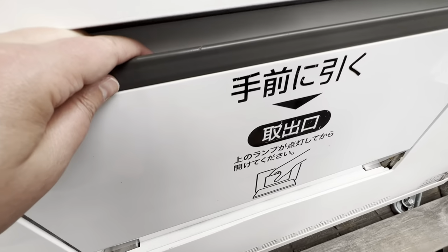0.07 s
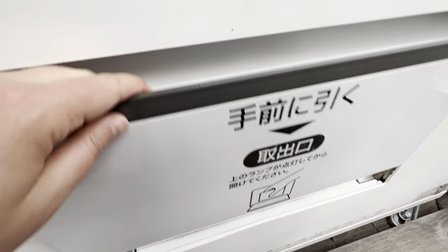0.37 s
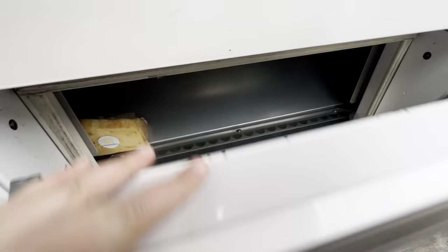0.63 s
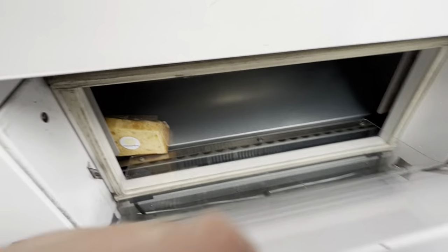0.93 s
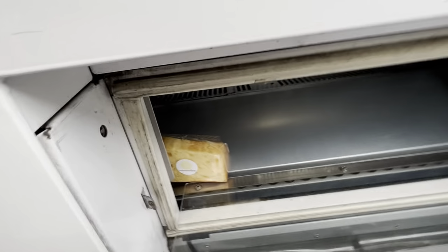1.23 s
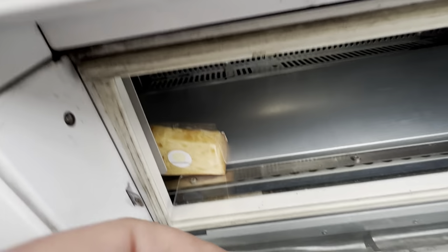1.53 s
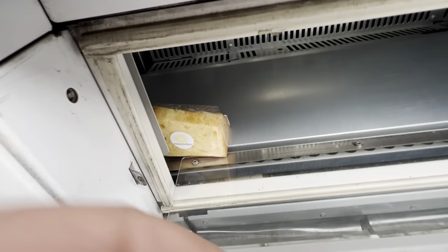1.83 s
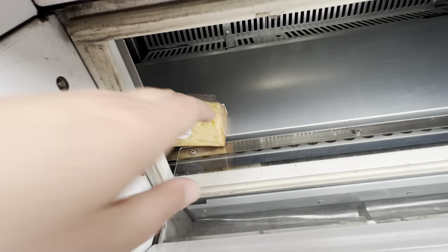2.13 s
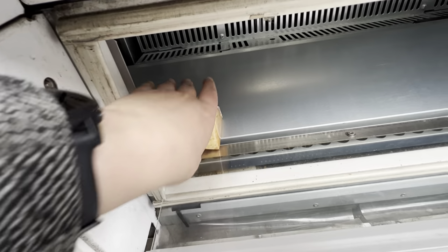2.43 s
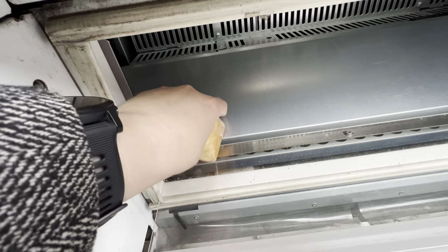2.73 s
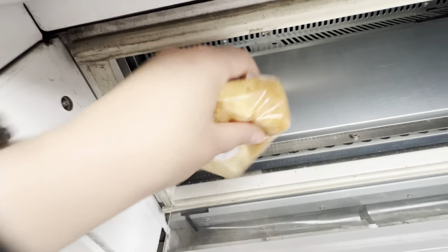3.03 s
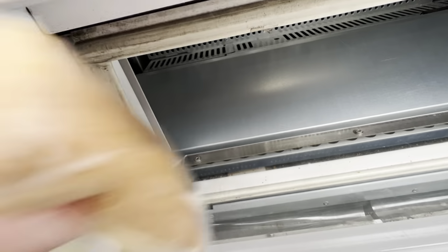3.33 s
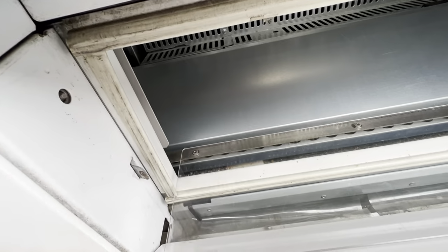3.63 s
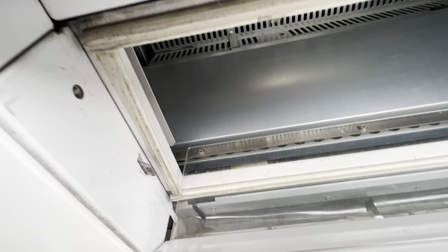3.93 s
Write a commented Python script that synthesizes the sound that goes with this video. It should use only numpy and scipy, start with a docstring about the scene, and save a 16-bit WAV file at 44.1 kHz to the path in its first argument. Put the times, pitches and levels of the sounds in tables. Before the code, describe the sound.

Heard up close, the metal flap of a refrigerated vending machine unlatches and drops open with two rattling knocks. Fan noise and a faint hiss join the steady hum, then a hand grabs a wrapped cake, crackling its plastic film.

```python
"""The flap of a refrigerated vending machine is pulled down: the catch clicks, the hinge rubs, the flap
clatters twice against its stops. Each contact chatters and rings the metal and the panel.
A hand then lifts out a cake in plastic film, which buckles in loud snaps and small creases.
The compressor hums throughout; fan noise and a thin hiss come out of the open cold compartment."""
import sys
import numpy as np
from scipy import signal
from scipy.fft import rfft, irfft
from scipy.io import wavfile

SR = 44100
rng = np.random.default_rng(int(sys.argv[2]) if len(sys.argv) > 2 else 0)


def transcribe(signal):
    """Save signal, clipped to [-1, 1], as a 16-bit WAV file at the path in sys.argv[1]."""
    frames = np.atleast_2d(signal).T
    limited = np.clip(frames, -1, 1)
    pcm = np.round(limited * 32767).astype(np.int16)
    wavfile.write(sys.argv[1], SR, pcm)


N = 176400
RING_SAMPLES = SR // 2
THIRD_OCTAVE_EDGES_HZ = 28 * 2 ** (np.arange(29) / 3)

# Left-right likeness of impacts and of steady noise: (frequency [Hz], correlation before clipping [-])
IMPACT_LIKENESS = [(60, 0.85), (250, 0.87), (600, -0.056), (1500, -0.27), (5000, -0.057), (14000, -0.0036)]
AIR_LIKENESS = [(50, 0.28), (130, 1), (300, 0.64), (700, 0.069), (9500, -0.014), (11200, -2.3),
                (12600, .85)]

# Machine noise: (frequency [Hz], relative density [dB])
COMPRESSOR_SPECTRUM = [(20, -9), (45, -5), (125, -4), (340, -5.5), (460, -25.5), (600, -9), (870, -19.5),
                       (2000, -28), (9000, -45.5), (15000, -63)]
FAN_SPECTRUM = [(40, -29), (110, 1), (175, -8), (255, 5.5), (370, -1), (440, 8.5), (640, -4.5), (740, -13),
                (840, -1.5), (980, -8.5), (2500, -24), (8000, -38)]
HISS_SPECTRUM = [(3000, -24), (5000, -6.5), (5720, -3), (6600, -8.5), (8100, -7), (9400, -8), (10400, -5.5),
                 (11800, -9.5), (12650, 2.5), (13500, 9), (14200, -7), (15600, -0.5)]
# Machine tones: (frequency [Hz], level [dB], steady power share [0-1])
COMPRESSOR_TONES = [(49.7, -47, .95), (100.1, -38.3, .97), (106.5, -48, .7), (126.3, -51.5, .8),
                    (607, -44.3, .9)]
FAN_TONES = [(141.3, -45.5, .6), (253, -51, .7), (635.2, -44.5, .6), (855.4, -40.8, .95)]
# Fan and hiss as the compartment opens: (time [s], gain [dB])
FAN_SWELL = [(0, -42), (.45, -7.5), (.62, -1.5), (1.0, -6.5), (1.4, -1), (4, -1)]
HISS_SWELL = [(.29, -31), (.6, 0.5), (.95, -6), (1.3, -1), (1.9, 0), (4, -1)]

# Film crack: (frequency [Hz], relative density [dB])
FILM_SPECTRUM = [(400, -1), (900, 4.5), (1700, -0.5), (3000, -7.5), (4500, -6), (7000, -4), (9200, 0.5),
                 (11500, -21), (13000, -7), (15500, -6)]
# Film snaps: (time [s], level [dB], facet resonance [Hz], pan L-R [dB])
FILM_SNAPS = [(2.4278, -11, 2960, -6.5), (2.438, -20, 1290, 13), (2.5025, -18, 6860, 4),
              (2.54, -19, 2430, 0), (2.6022, -10.5, 4200, -1.5), (2.62, -17.5, 6500, 2),
              (2.6741, -21.5, 7050, -8), (2.72, -16, 1490, -4), (2.73, -20, 1810, 4),
              (2.7654, -14, 1700, 1), (2.7877, -15.5, 1300, 2), (2.8139, -13, 3370, -4),
              (2.8173, -11, 1790, -3), (2.8769, -15.5, 4500, -1), (2.881, -19.5, 7850, 3),
              (2.9327, -20, 8900, -7), (3.043, -25, 8500, -3), (3.2624, -21, 2580, 6.5),
              (3.3651, -25, 8200, 9), (3.411, -25, 5600, 3), (3.6665, -28, 5400, 9),
              (3.7332, -30, 7500, 12), (3.7772, -26, 3420, 7), (3.9309, -31.5, 5300, 11)]
# How hard the film is handled: (time [s], crease level [dB])
FILM_HANDLING = [(2.36, -52.5), (2.53, -36), (2.58, -43.5), (2.66, -40.5), (2.73, -28.5), (2.80, -36),
                 (2.93, -34), (3.02, -44), (3.2, -50.5), (4, -52)]

# Flap contacts: (time [s], clack level [dB], thud level [dB], clack tilt [dB/octave])
FLAP_CONTACTS = [(0.3185, -40.5, -64, 2), (0.34, -33.5, -64, 8), (.355, -25.5, -30, -0.5),
                 (0.3921, -25, -45, -2.5), (.397, -36.5, -41, 3.5), (0.4615, -22, -24.5, -2.5),
                 (0.542, -26, -29.5, -2.5), (0.5665, -28, -29.5, -5), (.752, -48, -23, 3),
                 (0.7818, -21.5, -35, 3.5), (0.7864, -18, -14, -5.5), (0.8009, -18.5, -20, 0),
                 (.8094, -18.5, -22, 2), (.8187, -23.5, -25, 2), (0.827, -27, -25, 3),
                 (.848, -26.5, -28, -1.5), (0.8863, -28.5, -35, -3.5), (0.9252, -33, -54, -4.5),
                 (1.0161, -20, -20.5, -0.5), (1.033, -22, -16.5, -4), (1.0403, -18.5, -40, 1.5),
                 (1.051, -24.5, -26.5, 4.5), (1.076, -27.5, -27, -2.5), (1.118, -28.5, -39, -5),
                 (1.16, -32.5, -37, -5.5), (1.227, -38, -36, -15)]
# Dense ringing of flap (clack) and panel (thud): (frequency [Hz], relative density [dB])
CLACK_SPECTRUM = [(300, -40), (550, -8.5), (850, 6), (1100, 0), (1550, 3), (2100, -1), (2900, 3.5),
                  (4200, -5.5), (6300, -0.5), (8800, 0.5), (10200, -9.5), (11500, -12), (15500, -17)]
THUD_SPECTRUM = [(35, -15), (75, 1), (110, 0.5), (165, -4.5), (220, 2.5), (340, 2), (450, -0.5), (650, -17),
                 (1200, -25)]
# Its decay: (frequency [Hz], T60 [s])
CLACK_DECAY = [(400, 0.17), (1500, 0.16), (4000, 0.14), (9000, 0.028), (15000, .04)]
THUD_DECAY = [(60, 0.98), (200, 0.13), (600, 0.043)]
# Clear modes of the flap: (frequency [Hz], relative level [dB], T60 [s])
METAL_MODES = [(800, -19, .2), (900, -21, .2), (1170, -22, .35), (1482, -20, .28), (1514, -19, .28),
               (2957, -23, .25), (3180, -21, .2), (4830, -23, .16), (5695, -20, .16), (8212, -22, .12),
               (8477, -22, .12), (9226, -21, .12), (9809, -25, .15)]
PANEL_MODES = [(97, -1, .25), (220, -3, .21), (334, -1, .18), (407, 3.5, .22), (490, -2, .22),
               (641, -7, .15)]

# Microphone port peaks and notches: (frequency [Hz], width [Hz], left gain [dB], right gain [dB])
PORT_RESONANCES = [(4700, 2000, 2.5, -3), (5370, 260, -26, -29), (7606, 840, -30, -46), (9530, 690, 2, 10)]


def from_db(db):
    """Decibels to gain."""
    return 10 ** (np.asarray(db) / 20)


def unit_rms(x):
    """Scale to rms 1."""
    return x / np.sqrt(np.mean(x ** 2) + 1e-20)


def at_hz(table, hz):
    """Interpolate on a log-frequency axis."""
    points_hz, values = np.transpose(table)
    return np.interp(np.log(np.maximum(hz, 1)), np.log(points_hz), values)


def gain_curve(table):
    """Gain per sample from (time [s], level [dB])."""
    return from_db(np.interp(np.arange(N) / SR, *np.transpose(table)))


def pan(db):
    """Stereo gains for an L-R level difference."""
    return from_db(np.array([[.5], [-.5]]) * db)


def add(out, time_s, sound):
    """Mix a sound in at time_s."""
    start = int(time_s * SR)
    out[:, start:start + sound.shape[1]] += sound[:, :N - start]


def bandpass(x, hz, width_hz):
    """One resonance, peak gain 1."""
    return signal.lfilter(*signal.iirpeak(hz, hz / width_hz, fs=SR), x)


def mode(force, hz, t60_s):
    """Damped resonator: a unit impulse rings a sine of height 1."""
    r, w = np.exp(-np.log(1000) / (t60_s * SR)), 2 * np.pi * hz / SR
    return signal.lfilter([0, np.sin(w)], [1, -2 * r * np.cos(w), r * r], force + 1e-18)


def noise(spectrum, likeness, samples=N):
    """Coloured, partly correlated stereo noise; rms 1."""
    hz = np.arange(samples // 2 + 1) * SR / samples
    alike = np.clip(at_hz(likeness, hz), -.99, .99)
    mid, side = rfft(rng.standard_normal((2, samples))) * from_db(at_hz(spectrum, hz))
    stereo = np.sqrt(1 + alike) * mid + np.sqrt(1 - alike) * side * [[1], [-1]]
    return unit_rms(irfft(stereo, samples))


def dense_ring(spectrum, decay, tail_db, tail_t60_s, tilt_db_oct=0):
    """Many close modes struck at once: each third octave decays at its own rate, over a cabinet tail."""
    t = np.arange(RING_SAMPLES) / SR
    hz = np.arange(RING_SAMPLES // 2 + 1) * SR / RING_SAMPLES
    white = rfft(noise([(1, 0), (2, 0)], IMPACT_LIKENESS, RING_SAMPLES))
    tail = from_db(tail_db - 60 * t / tail_t60_s)
    out = np.zeros((2, RING_SAMPLES))
    for low_hz, high_hz in zip(THIRD_OCTAVE_EDGES_HZ, THIRD_OCTAVE_EDGES_HZ[1:]):
        if high_hz > spectrum[0][0] and low_hz < spectrum[-1][0]:
            centre_hz = np.sqrt(low_hz * high_hz)
            band = irfft(white * ((hz >= low_hz) & (hz < high_hz)), RING_SAMPLES)
            envelope = from_db(-60 * t / at_hz(decay, centre_hz)) + tail
            density_db = at_hz(spectrum, centre_hz) + tilt_db_oct * np.log2(centre_hz)
            out += unit_rms(band * envelope) * np.sqrt(high_hz - low_hz) * from_db(density_db)
    return unit_rms(out) * np.sqrt(.01 * SR / RING_SAMPLES)  # energy of 10 ms at rms 1


def tones(table, waver_share=0.01, left_lag_s=0.00027, control_hz=400):
    """Machine tones, part steady, part wavering; they reach the left ear later."""
    out, t = 0, np.arange(N) / SR
    control_t = np.arange(5 * control_hz) / control_hz
    for hz, db, steady in table:
        r = np.exp(-2 * np.pi * hz * waver_share / control_hz)
        white = rng.standard_normal((2, len(control_t)))
        real, imag = unit_rms(signal.lfilter([1], [1, -2 * r, r * r], white))
        waver = np.interp(t + 1, control_t, real + 1j * imag)  # skip 1 s of filter settling
        amplitude = np.sqrt(2 * steady) + np.sqrt(1 - steady) * waver
        carrier = np.exp(2j * np.pi * hz * np.array([t - left_lag_s, t]))
        out = out + from_db(db) * unit_rms(np.real(amplitude * carrier))
    return out


def compressor(noise_db=-39, tone_gain_db=-0.08):
    """Constant rumble and hum."""
    rumble = from_db(noise_db) * noise(COMPRESSOR_SPECTRUM, AIR_LIKENESS)
    return rumble + from_db(tone_gain_db) * tones(COMPRESSOR_TONES)


def fan(noise_db=-37.5, tone_gain_db=0.2, pan_db=-7):
    """Air noise and tones, heard through the opening."""
    air = from_db(noise_db) * noise(FAN_SPECTRUM, AIR_LIKENESS)
    hum = from_db(tone_gain_db) * tones(FAN_TONES)
    return gain_curve(FAN_SWELL) * pan(pan_db) * (air + hum)


def hiss(gain_db=-45, pan_db=0.5):
    """Thin hiss; grows as the compartment opens and comes closer."""
    return from_db(gain_db) * gain_curve(HISS_SWELL) * pan(pan_db) * noise(HISS_SPECTRUM, AIR_LIKENESS)


def buckle(facet_hz, t60_s, tail_db, tail_t60_s, facet_db=8, width_share=0.4):
    """One film crack with its compartment echo, coloured by the facet that buckles."""
    crack = dense_ring(FILM_SPECTRUM, [(1, t60_s)], tail_db, tail_t60_s)
    return crack + from_db(facet_db) * bandpass(crack, facet_hz, facet_hz * width_share)


def film_snaps(gain_db=-19.5):
    """Single facets buckle loudly."""
    out = np.zeros((2, N))
    for time_s, db, facet_hz, pan_db in FILM_SNAPS:
        snap = buckle(facet_hz, t60_s=0.0091, tail_db=-7, tail_t60_s=0.069)
        add(out, time_s, from_db(db + gain_db) * pan(pan_db) * snap)
    return out


def film_creases(rate_per_s=260, spread_db=3, facets=12):
    """Handling sets off a stream of small buckles, each on a random facet."""
    heights = from_db(spread_db * np.minimum(rng.exponential(1, N), 4)) * rng.choice([-1, 1], N)
    clicks = heights * (rng.random(N) < rate_per_s / SR)
    click_facet = rng.integers(0, facets, N)
    creases = np.zeros((2, N))
    for facet, hz in enumerate(np.geomspace(900, 9000, facets)):
        crack = buckle(hz, t60_s=0.0013, tail_db=-9.5, tail_t60_s=0.088)
        creases += signal.oaconvolve((clicks * (click_facet == facet))[None], crack)[:, :N]
    touched = np.arange(N) / SR > FILM_HANDLING[0][0]
    return touched * gain_curve(FILM_HANDLING) * unit_rms(creases)


def hinge(centre_s=.695, half_length_s=.018, level_db=-43.5):
    """Brief rub: the flap's colour through one broad resonance."""
    swell = np.exp(-((np.arange(N) / SR - centre_s) / half_length_s) ** 2)
    rub = bandpass(noise(CLACK_SPECTRUM, IMPACT_LIKENESS), hz=4350, width_hz=1000)
    return from_db(level_db) * swell * unit_rms(rub)


def ping(time_s=.8105, level_db=-45.5):
    """A thin metal part, knocked at the first stop, rings on."""
    knock = np.arange(N) == int(time_s * SR)
    return from_db(level_db) * mode(knock, hz=10280, t60_s=.65)


def contact_force(bounces_per_s=970, decay_s=0.0024, samples=1024):
    """One touch, then dying micro-bounces; unit energy."""
    bounces = (rng.random(samples) < bounces_per_s / SR) * rng.standard_normal(samples)
    force = bounces * np.exp(-np.arange(samples) / SR / decay_s)
    force[0] = 1
    return force[None] / np.linalg.norm(force)


def struck(modes, times_s, levels_db, pitch_ratio=1):
    """Each contact rings each mode with a random strength per ear."""
    out = 0
    for hz, mode_db, t60_s in modes:
        force = np.zeros((2, N))
        alike = np.clip(at_hz(IMPACT_LIKENESS, hz), 0, 1)
        for time_s, contact_db in zip(times_s, levels_db):
            common = np.sqrt(alike) * rng.choice([-1, 1])
            per_ear = np.sqrt(1 - alike) * rng.standard_normal(2)
            force[:, int(time_s * SR)] = from_db(contact_db) * (common + per_ear)
        out = out + from_db(mode_db) * mode(force, hz * pitch_ratio, t60_s)
    return out


def flap_impacts(clack_rise_s=0.00039, thud_rise_s=0.0033, clack_pan_db=-1):
    """Each contact gives a chattering clack and a slower-rising panel thud."""
    out, t = np.zeros((2, N)), np.arange(RING_SAMPLES) / SR
    for time_s, clack_db, thud_db, tilt_db_oct in FLAP_CONTACTS:
        clack = dense_ring(CLACK_SPECTRUM, CLACK_DECAY, tail_db=-29, tail_t60_s=0.8,
                           tilt_db_oct=tilt_db_oct)
        clack *= 1 - np.exp(-t / clack_rise_s)
        thud = dense_ring(THUD_SPECTRUM, THUD_DECAY, tail_db=-19, tail_t60_s=0.33)
        thud *= 1 - np.exp(-t / thud_rise_s)
        chatter = signal.fftconvolve(clack, contact_force())
        add(out, time_s, from_db(clack_db) * pan(clack_pan_db) * chatter)
        add(out, time_s, from_db(thud_db) * thud)
    return out


def flap_ring(metal_gain_db=-0.5, panel_gain_db=-10.5, fully_open_s=1.0):
    """The contacts ring clear modes of metal and panel; fully open, the panel rings lower."""
    times_s, clack_db, thud_db, _ = np.transpose(FLAP_CONTACTS)
    is_open = times_s > fully_open_s
    panel = struck(PANEL_MODES, times_s[~is_open], thud_db[~is_open])
    panel += struck(PANEL_MODES, times_s[is_open], thud_db[is_open], pitch_ratio=.9)
    metal = struck(METAL_MODES, times_s, clack_db)
    return from_db(metal_gain_db) * metal + from_db(panel_gain_db) * panel


def scene():
    """Machine, flap and film."""
    machine = compressor() + fan() + hiss()
    flap = flap_impacts() + flap_ring() + hinge() + ping()
    return machine + flap + film_snaps() + film_creases()


def record(dry):
    """The ports colour each channel; a steep low-pass cuts the top."""
    for hz, width_hz, left_db, right_db in PORT_RESONANCES:
        dry = dry + (from_db([[left_db], [right_db]]) - 1) * bandpass(dry, hz, width_hz)
    cutoff_hz = 15750
    return signal.sosfilt(signal.ellip(12, .1, 90, cutoff_hz, fs=SR, output="sos"), dry)


dry = scene()
out = record(dry)
transcribe(out)
```